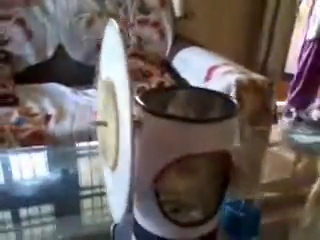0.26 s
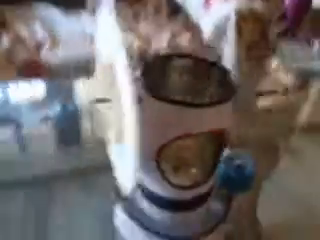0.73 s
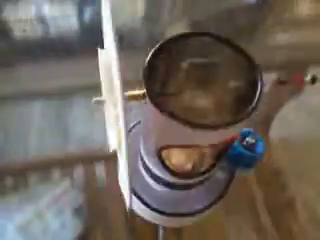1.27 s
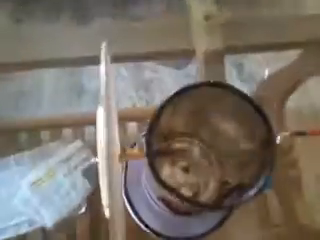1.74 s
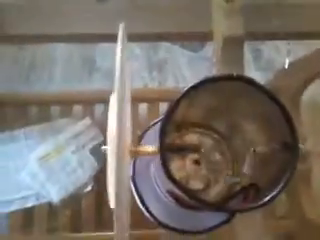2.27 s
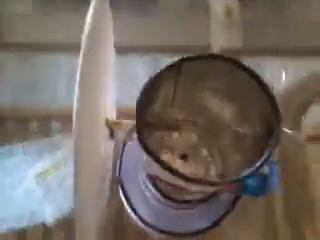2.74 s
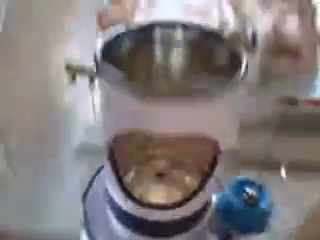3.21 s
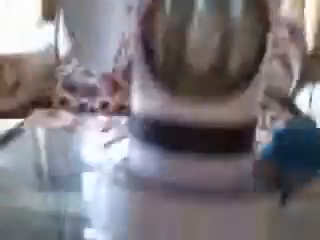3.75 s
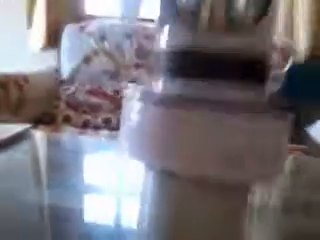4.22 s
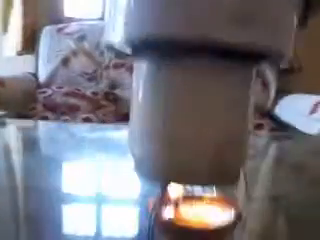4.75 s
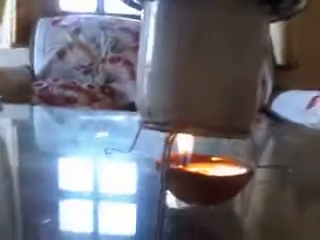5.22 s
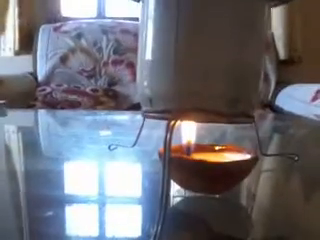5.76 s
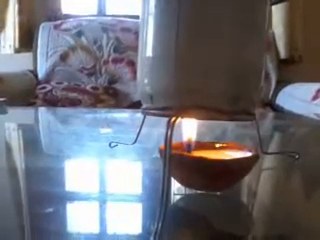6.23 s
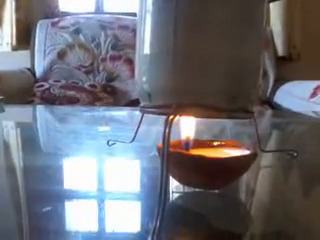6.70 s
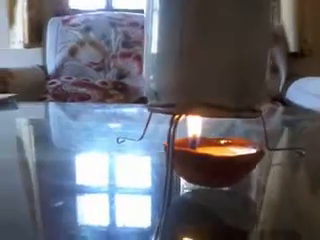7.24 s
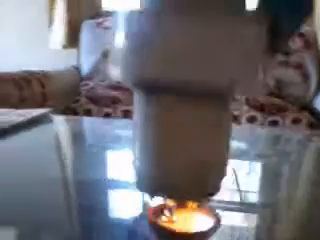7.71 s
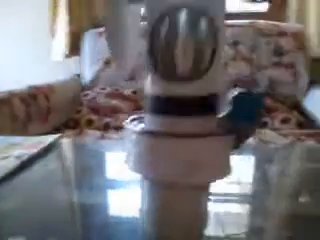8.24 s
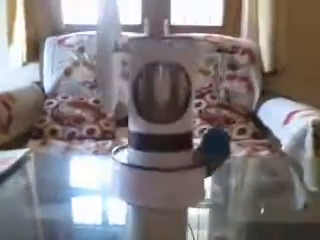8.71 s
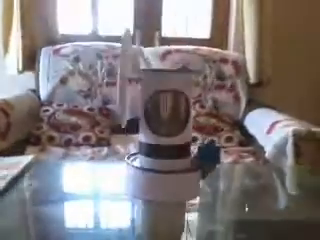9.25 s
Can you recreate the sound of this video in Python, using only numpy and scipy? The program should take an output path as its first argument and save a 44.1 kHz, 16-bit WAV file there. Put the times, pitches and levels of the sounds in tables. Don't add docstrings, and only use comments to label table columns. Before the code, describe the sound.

A tiny hot-air engine built from cans runs very close to a phone microphone in a quiet room. Every turn, about 0.4 seconds, brings a hollow crank knock and two bright wire-and-tin rattles, with smaller ticks and soft thuds over a flickering thin hiss. Just before four seconds something hard bangs and distorts, followed by brief rustle and dull shifting; then the even clatter goes on with faint squeaks.

```python
import sys
import numpy as np
from scipy import signal
from scipy.fft import rfft, irfft
from scipy.io import wavfile
from scipy.ndimage import uniform_filter1d

SR = 44100
rng = np.random.default_rng(int(sys.argv[2]) if len(sys.argv) > 2 else 0)


def file_out(sig):
    cols = np.atleast_2d(sig).T
    lim = np.clip(cols, -1, 1)
    pcm = np.round(lim * 32767).astype(np.int16)
    wavfile.write(sys.argv[1], SR, pcm)


def boost_factor(decibels):
    exponent = np.asarray(decibels, float) / 20
    return 10 ** exponent


N = 417627
TURN_S = 0.405

# start [s], level [dB], body pitch [Hz].
CRANK_KNOCKS = [(0.3666, -26, 1840), (0.7809, -26.5, 1880), (1.2016, -26.5, 1920), (1.616, -24.5, 1880),
                (2.0274, -24, 1900), (2.4404, -21.5, 1880), (2.8521, -21.5, 1920), (3.2635, -22.5, 1940),
                (3.6699, -23.5, 1870), (4.0744, -22.5, 1900), (4.4768, -23, 1980), (4.8797, -26.5, 2180),
                (5.287, -28, 1980), (5.695, -26.5, 1800), (6.099, -26.5, 1880), (6.495, -26.5, 1830),
                (6.8926, -26, 1846), (7.2891, -26, 1800), (7.6905, -25.5, 2170), (8.0921, -23, 1980),
                (8.4883, -23.5, 1947), (8.8877, -25, 1990), (9.2869, -25, 2070)]
# frequency [Hz], t60 [s], level [dB].
TICK_MODES = [(760, .016, -5), (1140, .011, -2), (1690, 0.0059, 3.5), (2700, 0.0082, -8.5),
              (3600, .006, -8), (5480, .006, 3)]


def noise(lo_hz, hi_hz, order=2):
    sos = signal.butter(order, [lo_hz, hi_hz], "band", fs=SR, output="sos")
    x = signal.sosfilt(sos, rng.standard_normal(N))
    return x / x.std()


def walk(rate_hz):
    k = int(SR / rate_hz)
    held = np.repeat(rng.standard_normal(N // k + 1), k)
    return 1.92 * uniform_filter1d(uniform_filter1d(held, k), k)[:N]


def strike(start_s, peak_db, mode_hz, t60_s, mode_db, push_s, detune=0.021, scatter_db=4):
    t = np.arange(4096) / SR
    modes = len(t60_s)
    mode_hz = np.broadcast_to(mode_hz, (len(start_s), modes))
    chance = rng.standard_normal((len(start_s), 3, modes))
    rise = 1 - np.exp(-(t / push_s) ** 2)
    out = np.zeros(N + len(t))
    for s, db, hz, (pitch, level, phase) in zip(start_s, peak_db, mode_hz, chance):
        exponent = 2j * np.pi * hz * (1 + detune * pitch) - np.log(1000) / t60_s
        waves = np.exp(np.outer(t, exponent) + 2j * phase)
        ring = (waves @ boost_factor(mode_db + scatter_db * level)) * rise
        i = int(s * SR)
        out[i:i + len(t)] += boost_factor(db) * ring.imag / np.abs(ring).max()
    return out[:N]


def with_tail(x, tail_db, t60_s, lo_hz, hi_hz, gap_s=0.0069):
    t = np.arange(int(0.4 * SR)) / SR
    power = (boost_factor(-60 * t / t60_s) * (1 - np.exp(-(t / gap_s) ** 2))) ** 2
    envelope = np.sqrt(np.abs(signal.fftconvolve(x ** 2, power / power.sum())[:N]))
    grain = boost_factor(2.5 * walk(220))
    return x + boost_factor(tail_db) * envelope * noise(lo_hz, hi_hz) * grain


def phone(s):
    # time [s], height [-1 by the lamp to 1 above the can], nearness [dB].
    path = [
        (0.0, 0.12, 0.5),
        (0.9, .05, 0),
        (1.4, 1, 4.3),
        (2.798, 1, 2.3),
        (3.6, 0.24, 2.3),
        (4.4, -1.04, 2.7),
        (7.7, -1.22, 2.8),
        (8.4, -0.063, 0),
        (9.47, -0.14, -1),
    ]
    t, height, near_db = np.transpose(path)
    h = np.interp(s, t, height)
    return np.clip(h, 0, 1), np.clip(-h, 0, 1), np.interp(s, t, near_db)


def linkage():
    # frequency [Hz], t60 [s], level [dB].
    body_modes = [(606, 0.02, -6), (1111, 0.058, -9), (1281, 0.021, 0), (1520, 0.012, -2),
                  (1880, 0.0093, 1.5), (2236, 0.0074, 3.5)]
    wire_modes = [(2690, 0.019, -3), (3337, 0.023, -4.5), (3800, 0.013, 3), (4380, 0.0095, 2.5),
                  (4820, 0.023, -7)]
    tin_modes = [(5273, 0.011, -11), (5907, 0.018, -13), (6485, 0.016, -13.5), (6778, 0.0088, 4.5),
                 (6906, 0.015, 12.5), (7174, 0.019, 7)]
    s, body_db, wire_db, tin_db = contacts()
    body = strike(s, body_db + 1.0, *np.transpose(body_modes), push_s=0.001)

    knock_s, knock_db, pitch_hz = np.transpose(CRANK_KNOCKS)
    same = np.ones(len(knock_s))
    hollow_hz = np.stack([1250 * same, 0.84 * pitch_hz, 0.96 * pitch_hz, 1.06 * pitch_hz, 640 * same], axis=1)
    hollow_t60_s = np.array([0.025, 0.009, 0.011, 0.015, 0.02])
    hollow_db = np.array([-6, 2.5, 6.0, -2.0, -23])
    crank = strike(knock_s, knock_db + 2.0, hollow_hz, hollow_t60_s, hollow_db,
                   push_s=0.00069, detune=0.015, scatter_db=4.5)
    crank += strike(knock_s, knock_db - 14.5, *np.transpose(TICK_MODES), push_s=0.00058, scatter_db=5.0)

    s = np.r_[s, knock_s]
    wire_db, tin_db = np.r_[wire_db, -32 * same], np.r_[tin_db, -27 * same]
    wire = strike(s, wire_db + 2.5, *np.transpose(wire_modes), push_s=0.00058, detune=0.05, scatter_db=2.5)
    tin = strike(s, tin_db + 11.0, *np.transpose(tin_modes), push_s=0.00072, detune=0.0088)

    out = with_tail(crank, -12, 0.28, 1050, 1800)
    out += with_tail(body, -9.5, 0.32, 850, 2300)
    out += with_tail(wire, -11.0, 0.24, 2500, 7800)
    return out + with_tail(tin, -10.0, 0.33, 6690, 8000)


def contacts():
    # start [s], level [dB], rebound delay [s], rebound [dB].
    drops = [(0.0542, -19.5, .012, -31), (0.4674, -22.5, 0.013, -31), (0.882, -23.5, .011, -28.5),
             (1.2994, -23, 0.0086, -25.5), (1.7153, -27.5, 0.0081, -26), (2.1283, -23, 0.0082, -26),
             (2.541, -22.5, 0.012, -28), (2.9517, -21.5, 0.0073, -27), (3.361, -19, 0.014, -34),
             (4.1722, -17, 0.0088, -20), (4.5743, -22, 0.014, -27), (4.9882, -28.5, 0.0076, -37),
             (5.3884, -24.5, .0145, -25), (5.7956, -23.5, 0.01, -22.5), (6.2001, -24.5, .0085, -28.5),
             (6.5972, -24, .0085, -26), (7.0033, -22, 0.011, -40), (7.393, -24.5, 0.0071, -23.5),
             (7.7936, -20, 0.007, -27), (8.1947, -24.5, 0.0061, -29), (8.5954, -24.5, 0.024, -35),
             (8.99, -22.5, .01, -42), (9.392, -24.5, 0.0074, -36)]
    # start [s], slap delay [s], slap [dB], bounce [dB].
    lifts = [(0.2288, 0.0084, -23, -30), (0.6313, 0.0068, -26.5, -27), (1.0502, 0.0061, -21, -22),
             (1.4912, .0104, -21, -41), (1.885, 0.0069, -23.5, -25), (2.298, 0.0065, -25, -35),
             (2.7144, 0.0059, -25, -21), (3.126, 0.0062, -23, -20), (3.5301, 0.011, -18, -41),
             (3.9404, 0.0079, -19, -32), (4.3455, 0.0067, -23, -19.5), (4.753, 0.0057, -25, -23.5),
             (5.149, .0056, -23, -18), (5.561, .007, -23.5, -26.5), (5.972, 0.0073, -25.5, -27),
             (6.3696, .005, -24, -23.5), (6.7683, 0.0044, -22.5, -36), (7.164, 0.0059, -21.5, -34),
             (7.5632, 0.006, -22, -30.5), (7.9699, 0.0098, -27.5, -27), (8.3548, 0.0089, -28, -33),
             (8.763, 0.0045, -28, -31), (9.1512, 0.0063, -33, -26)]
    colour = {"drop": (-9, -14.5), "rebound": (-8.5, -19), "touch": (-7, -9.5), "slap": (-8.5, -19),
              "bounce": (-11, -14.5), "settle": (-4.5, -6.5)}
    # start [s], can body [dB], tin ring [dB].
    strays = [(0.0885, -44, -41), (0.218, -49, -32), (2.0967, -56, -24.5), (2.1646, -49, -40),
              (2.46, -41, -29), (2.578, -57, -33), (2.9134, -40.5, -43), (4.4975, -36, -53),
              (7.428, -51, -37), (7.5978, -40, -27.5), (7.828, -50, -39), (8.2167, -42, -42),
              (8.4568, -32, -45), (8.626, -44, -30)]
    drop_s, drop_db, rebound_s, rebound_db = np.transpose(drops)
    lift_s, slap_s, slap_db, bounce_db = np.transpose(lifts)
    # kind, start s, level dB, loose (1 = chance in level and time)
    kinds = [("drop", drop_s, drop_db, 0),
             ("rebound", drop_s + rebound_s, rebound_db, 0),
             ("touch", drop_s + 0.0064, -37, 1),
             ("touch", lift_s, -28.5, 0),
             ("slap", lift_s + slap_s, slap_db, 0),
             ("bounce", lift_s + 0.009, bounce_db, 0),
             ("settle", lift_s + 0.025, -36.5, 1),
             ("touch", lift_s + 0.0145, -41.5, 1),
             ("touch", lift_s + 0.045, -41.5, 1)]
    loose_db, loose_s = 4, 0.0008
    rows = []
    for kind, s, db, loose in kinds:
        level, timing, body, wire = rng.standard_normal((len(s), 4)).T
        body_colour_db, wire_colour_db = colour[kind]
        tin_db = db + loose * loose_db * level
        hidden_db = -3.5 * phone(s)[1]
        body_db = tin_db + body_colour_db + hidden_db + 0.76 * body
        wire_db = tin_db + wire_colour_db + 2.2 * wire
        rows.append([s + loose * loose_s * timing, body_db, wire_db, tin_db])
    s, body_db, tin_db = np.transpose(strays)
    return np.hstack(rows + [[s, body_db, (body_db + tin_db) / 2 - 3.0, tin_db]])


def thuds():
    # delay after knock [s], level [dB], gain low down [dB],
    # pitch [Hz].
    turn_thuds = [
        (-.036, -49, 7, 510),
        (-.04, -56.5, 1, 226),
        (0.03, -52.5, 6.5, 578),
        (.061, -48.5, 6.5, 470),
        (.069, -51.5, 7, 430),
        (.16, -56.5, 5.5, 450),
    ]
    # start [s], level [dB], pitch [Hz].
    jolts = [
        (0.92, -42, 570),
        (0.993, -38, 424),
        (1.099, -49.5, 294),
        (3.92, -29, 469),
        (3.981, -23, 450),
        (4.024, -24, 510),
        (4.053, -30.5, 363),
        (4.11, -39, 330),
        (2.4, -43, 463),
    ]
    knock_s = np.array(CRANK_KNOCKS)[:, 0]
    knock_s = np.r_[knock_s[0] - TURN_S, knock_s][:, None]
    delay_s, db, low_db, hz = np.transpose(turn_thuds)
    above, below, near_db = phone(knock_s)
    level, pitch = rng.standard_normal((2, knock_s.size, hz.size))
    beside = 1 - above - below
    pitch_factor = 1 + 0.23 * above - 0.15 * beside + 0.042 * pitch
    rows = np.array([knock_s + delay_s, db + low_db * below + near_db + 1.6 * level, hz * pitch_factor])
    rows = np.hstack([rows.reshape(3, -1), np.transpose(jolts)])
    s, db, hz = rows[:, (rows[0] > 0) & (rows[0] < N / SR)]
    mode_hz = np.outer(hz, [0.36, 0.7, 1, 1.4])
    t60_s, mode_db = np.array([0.06, 0.035, 0.031, 0.023]), np.array([-17, -7, 8.5, 4.5])
    x = strike(s, db + 2.5, mode_hz, t60_s, mode_db, push_s=0.00096, scatter_db=2.8)
    return with_tail(x, -12, 0.23, 360, 760)


def ticks():
    # start [s], level [dB].
    tick_events = [(0.155, -34.5), (0.563, -43), (1.389, -48), (1.819, -52), (2.226, -37.5), (2.646, -35.5),
                   (3.061, -34), (3.472, -34), (4.284, -37), (4.684, -29.5), (5.093, -32), (5.497, -29),
                   (5.904, -30), (6.307, -29.5), (6.705, -44), (7.103, -37), (7.497, -27.5), (7.901, -33),
                   (8.298, -36.5), (8.699, -30.5), (9.094, -32)]
    squeak_events = [(4.4333, -41), (4.8184, -37), (5.2187, -40), (5.238, -45), (5.6401, -44.5),
                     (5.8294, -48), (6.0506, -45.5), (6.2244, -46), (6.4494, -45), (6.6294, -54),
                     (6.8404, -45), (6.9775, -40), (7.2489, -45), (7.427, -46), (7.6505, -44)]
    # frequency [Hz], t60 [s], level [dB].
    squeak_modes = [(5180, 0.019, -5), (5470, .018, 2), (5930, .014, -3)]
    tick = strike(*np.transpose(tick_events), *np.transpose(TICK_MODES), push_s=0.00097, scatter_db=5.5)
    squeak = strike(*np.transpose(squeak_events), *np.transpose(squeak_modes), push_s=0.0013, detune=0.029)
    return with_tail(tick, -20, 0.15, 650, 3500) + boost_factor(3.0) * squeak


def rubbing():
    # start [s], hold [s], hand rumble [dB], dull [dB], bright [dB].
    handling = [
        (0.0, 0.12, -92, -67.5, -55),
        (0.938, 0.18, -88, -57.5, -52),
        (1.78, 0.051, -95, -91, -47),
        (2.095, 0.037, -101, -67, -46.5),
        (3.123, 0.036, -101, -77, -44),
        (3.32, 0.11, -97, -75.5, -41.5),
        (3.874, .14, -60, -35.5, -36.5),
        (4.21, 0.15, -71.5, -64, -59),
        (4.505, 0.29, -78, -75, -64),
    ]
    t = np.arange(N) / SR
    above, below, near_db = phone(t)
    rise_db_s, fall_db_s = 150, 110
    swell_db = []
    for s, hold_s, *_ in handling:
        slope_db = np.minimum(rise_db_s * (t - s), fall_db_s * (s + hold_s - t))
        swell_db.append(np.minimum(0, slope_db))
    levels = boost_factor(np.array(handling)[:, 2:])
    rumble, dull, bright = levels.T @ boost_factor(np.array(swell_db))

    low = boost_factor(-62 + 1.5 * below + near_db)
    mid = boost_factor(-59.5 - 0.5 * below) + boost_factor(-10) * dull + boost_factor(-11) * bright
    tin = boost_factor(-53.5 - 7 * below) + bright

    knock_s = np.array(CRANK_KNOCKS)[:, 0]
    turn_s = np.r_[knock_s[0] - TURN_S, knock_s, knock_s[-1] + TURN_S]
    turn = np.interp(t, turn_s, np.arange(len(turn_s)))
    slip_db = walk(14)
    slide_db = -0.5 * np.cos(2 * np.pi * (turn - 0.18))

    hand_noise = noise(38, 85) + 0.35 * noise(140, 170)
    out = (boost_factor(-91.5) + rumble) * boost_factor(2.6 * walk(9)) * hand_noise
    low_noise = 0.49 * (noise(251, 620) + 1.57 * noise(424, 918))
    out += (low + 0.77 * dull) * boost_factor(2.73 * walk(45)) * low_noise
    out += dull * boost_factor(2.3 * walk(40)) * noise(240, 520)
    mid_noise = 0.86 * (noise(890, 2170) + 0.74 * noise(2400, 5000))
    out += mid * boost_factor(0.35 * slide_db + 0.55 * slip_db + 2.43 * walk(60)) * mid_noise
    tin_noise = 1.72 * (0.36 * noise(4460, 10400) + noise(6710, 7280))
    out += tin * boost_factor(slide_db + 0.49 * slip_db + 2.0 * walk(90)) * tin_noise
    return out + boost_factor(-88) * noise(20, 36)


def bump():
    # start [s], level [dB].
    blows = [
        (3.7527, -22),
        (3.758, 4.5),
        (3.7605, -1),
        (3.769, -9),
        (3.777, -25),
    ]
    # frequency [Hz], level [dB].
    wash_colour = [(24, -56.5), (50, -31.5), (150, -32), (297, -8.5), (809, -6.5), (3000, -13.5),
                   (7100, -10.5), (9490, -55)]
    # frequency [Hz], level [dB], t60 [s].
    bump_modes = [(289, -9, 0.25), (469, -2, 0.17), (619, -5.5, 0.19), (910, -2.5, 0.17), (1088, -9, 0.25),
                  (1785, 9.5, 0.036)]
    t = np.arange(SR // 2) / SR
    f = np.fft.rfftfreq(len(t), 1 / SR)
    hz, db = np.transpose(wash_colour)
    colour_db = np.interp(np.log(f + 1), np.log(hz), db)
    wash = irfft(rfft(rng.standard_normal(len(t))) * boost_factor(colour_db))
    wash /= wash.std()
    decay = boost_factor(-60 * t / 0.33) + 1.26 * boost_factor(-60 * t / 0.04)
    wash *= decay * (1 - np.exp(-t / 0.0025))
    s, blow_db = np.transpose(blows)
    hz, db, t60_s = np.transpose(bump_modes)
    out = strike(s, blow_db - 6, hz, t60_s, db, push_s=0.00047, detune=0.0096, scatter_db=4.0)
    start = int(s[1] * SR)
    out[start:start + len(t)] += boost_factor(-13.0) * wash * boost_factor(1.4 * walk(120)[:len(t)])
    return out


def scene():
    engine_high_pass = signal.butter(4, 146, "high", fs=SR, output="sos")
    engine = signal.sosfilt(engine_high_pass, linkage() + ticks() + thuds())
    return (engine + rubbing() + bump())[None]


def low_pass(x):
    return signal.sosfilt(signal.butter(12, 16490, fs=SR, output="sos"), x)


def record(dry):
    mic_top_hz, sampling_hz = 7250, 16000
    x = signal.sosfilt(signal.cheby2(8, 50, 8000, fs=SR, output="sos"), dry)
    mirror = x * np.cos(2 * np.pi * sampling_hz * np.arange(N) / SR)
    mirror_band_hz = [sampling_hz - mic_top_hz - 400, 8880]
    mirror = signal.sosfilt(signal.butter(4, mirror_band_hz, "band", fs=SR, output="sos"), mirror)
    x = np.clip(x + boost_factor(-22) * mirror, -0.71, 0.71) - 0.0013
    return low_pass(x)


dry = scene()
out = record(dry)
file_out(out)
```